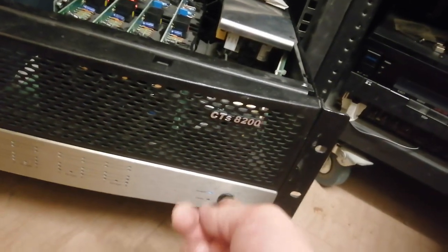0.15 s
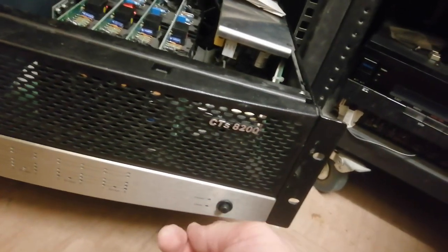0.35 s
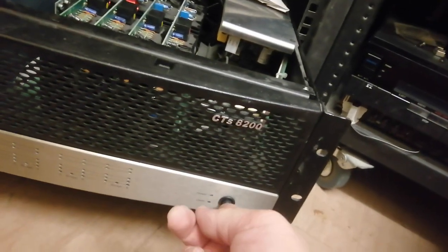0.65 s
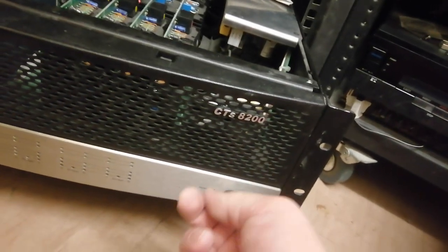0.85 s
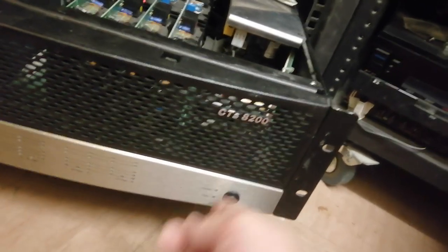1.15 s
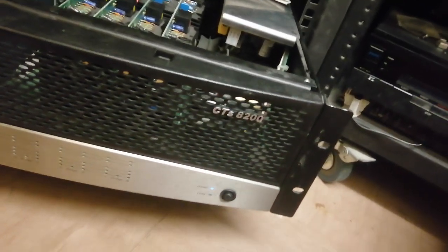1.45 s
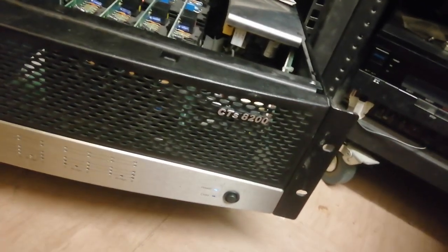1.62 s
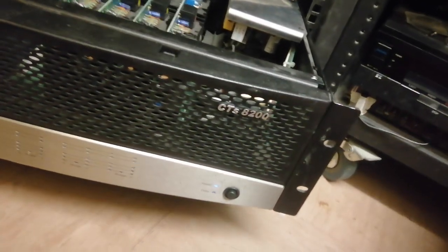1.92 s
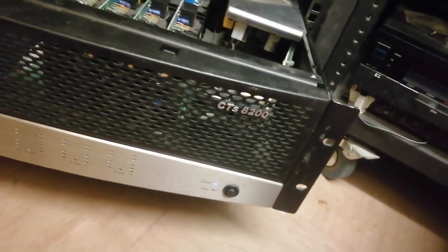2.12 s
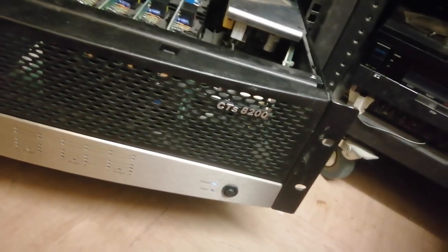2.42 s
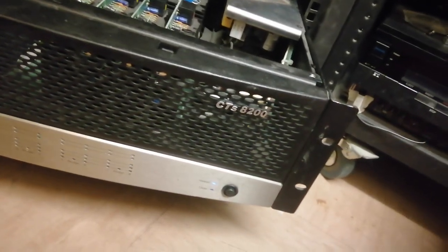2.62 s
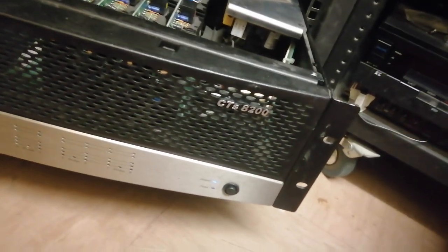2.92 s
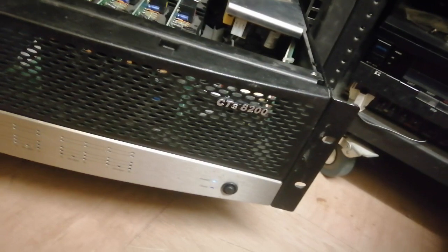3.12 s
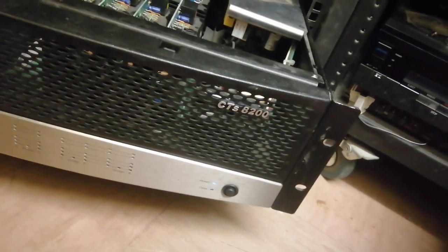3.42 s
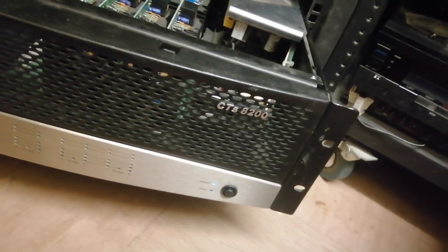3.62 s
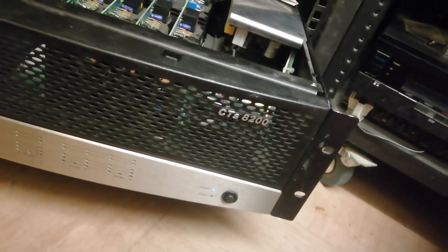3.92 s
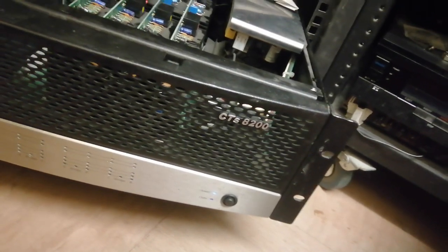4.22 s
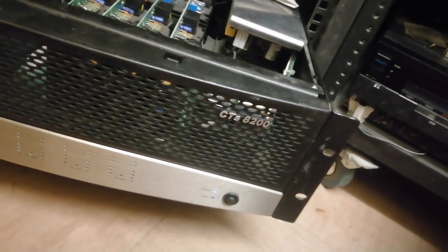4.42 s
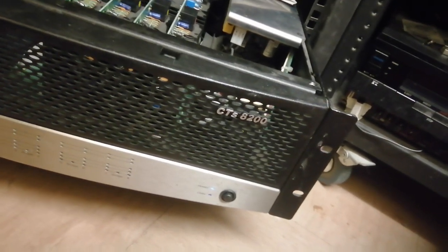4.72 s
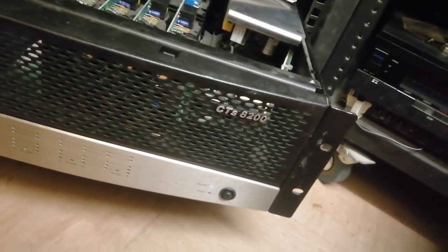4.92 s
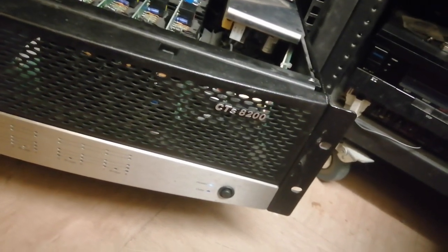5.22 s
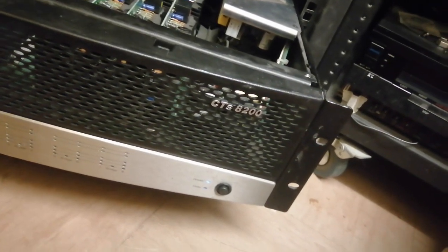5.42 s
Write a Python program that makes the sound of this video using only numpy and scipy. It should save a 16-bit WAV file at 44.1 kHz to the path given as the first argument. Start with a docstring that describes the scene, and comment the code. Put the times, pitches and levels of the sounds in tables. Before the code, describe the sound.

Close stereo microphones in a small workshop catch the crisp clicks of a latching power button, pushed and released twice. The amplifier gives a very faint, short buzz and a thin whistle, ending in a small tick. Only low hum and ventilation remain until one bright, sharp relay click sounds near the end.

```python
"""Rack amplifier powering up

A small workshop, a stereo pair of microphones close to an amplifier with its lid off. A finger works
the latching power button twice; the transformer buzzes, the supply whistles briefly and a relay closes.
Seconds later the output relays snap in. Machines hum steadily in the room, and the recorder's gain
control ducks that hum after each sharp click."""
import sys
import numpy as np
from scipy import signal
from scipy.fft import rfft, irfft
from scipy.io import wavfile
from scipy.ndimage import uniform_filter1d, minimum_filter1d

SR = 44100
rng = np.random.default_rng(int(sys.argv[2]) if len(sys.argv) > 2 else 0)


def int16_out(signal):
    """Quantize to a 16-bit WAV file."""
    q = np.round(np.clip(np.atleast_2d(signal).T, -1, 1) * 32767)
    wavfile.write(sys.argv[1], SR, q.astype(np.int16))


N = 244887
TIME = np.arange(N) / SR
FREQ = np.arange(N // 2 + 1) * SR / N


def undb(db):
    """Decibels to gain."""
    return 10 ** (np.asarray(db) / 20)


def over_pitch(points, hz):
    """Read (Hz, value) points on a log-frequency axis."""
    at, value = np.transpose(points)
    return np.interp(np.log(hz + 1), np.log(at), value)


def pan(db):
    """Microphone gains for a balance: left minus right, in dB."""
    return undb(np.array([[.5], [-.5]]) * db)


def walk(rate_hz):
    """Random drift with a spread of 1."""
    drift = irfft(rfft(rng.standard_normal(N)) * np.exp(-(FREQ / rate_hz) ** 2), N)
    return drift / drift.std()


def noise_pair(likeness):
    """Noise at two microphones that share a part of it."""
    shared = np.sqrt(likeness) * rng.standard_normal(N)
    return shared + np.sqrt(1 - likeness) * rng.standard_normal((2, N))


def ramp(start_s, length_s):
    """A straight rise from 0 to 1."""
    return np.clip((TIME - start_s) / length_s, 0, 1)


def surge(start_s, attack_s, db, fall_db_per_s):
    """Gain that rises from the start and dies away at a steady rate."""
    return ramp(start_s, attack_s) * undb(db - fall_db_per_s * np.maximum(TIME - start_s, 0))


def swells(rows):
    """Gain of soft, bell-shaped swells."""
    return sum(undb(db) * np.exp(-((TIME - at) / length) ** 2) for at, db, length in rows)


def sine(hz, waver_hz, waver_rate):
    """A gliding, unsteady tone of unit power."""
    return np.sqrt(2) * np.sin(2 * np.pi * np.cumsum(hz + waver_hz * walk(waver_rate)) / SR)


def body(x, colour, modes=()):
    """Causal filter of unit power: a broad colour with resonances standing on it."""
    cepstrum = irfft(np.log(undb(over_pitch(colour, FREQ))), N)
    cepstrum[1:N // 2] *= 2  # fold to minimum phase
    cepstrum[N // 2:] = 0
    rings = sum(undb(db) * 1j * FREQ * width / (hz ** 2 - FREQ ** 2 + 1j * FREQ * width)
                for hz, width, db in modes)
    response = np.exp(rfft(cepstrum)) * (1 + rings)
    return irfft(rfft(x) * response / np.sqrt(np.mean(abs(response) ** 2)), N)


# Workshop air and microphone hiss. Each row: frequency in Hz, relative level in dB.
AIR_COLOUR = [(20, 25.5), (38, 17.5), (50, 25.5), (64, 24.5), (105, 17.5), (135, 13.5), (250, 7.5),
              (350, 7.5), (480, 8), (1000, 2.5), (1500, 1), (3000, -2), (4000, -11.5), (5500, -4.5),
              (7000, -9), (8500, -13.5), (12000, -10.5), (13800, -10.5), (14900, -4.5), (15800, -12.5)]
# The air leans to the right microphone. Each row: frequency in Hz, balance in dB.
AIR_PAN = [(50, -3), (300, -11.5), (1000, -5), (2400, -3.5), (15000, -5)]

def air():
    """Ventilation rumble, alike at both microphones, under a thin hiss."""
    likeness = over_pitch([(100, 0.8), (500, 0.64), (1500, 0.048), (5000, 0.12)], FREQ)
    shared = np.sqrt(likeness) * rfft(rng.standard_normal(N))
    separate = np.sqrt(1 - likeness) * rfft(noise_pair(0))
    noise = irfft((shared + separate) * pan(over_pitch(AIR_PAN, FREQ)), N)
    return body(noise, AIR_COLOUR) * undb(-65.5)


# A rush off to the right. Each row: peak time in seconds, level in dB, half-length in seconds.
RUSH_SWELLS = [(0.01, -69, 0.03), (1.36, -65.5, .14), (3.93, -69.5, 0.21)]
# Its hollow colour. Each row: frequency in Hz, relative level in dB.
RUSH_COLOUR = [(150, -21.5), (270, -9), (330, 11), (420, -11), (600, -17), (1400, -28.5), (8000, -55)]

def rush():
    """Low, hollow noise swells and sinks in the room."""
    return body(noise_pair(.8), RUSH_COLOUR) * swells(RUSH_SWELLS) * pan(-8.5)


# Motors and mains around the workshop. Each row: pitch in Hz, level in dB, waver in dB, balance in dB.
MACHINE_TONES = [(48.7, -63, 2.5, -7.5), (102, -85.5, 3.5, -4), (157.7, -76, 1.5, -11),
                 (300, -71, 1.36, -6.5), (549.8, -78, 0.6, -17.5), (626, -88, 3, -11)]

def machine_hum():
    """Steady tones waver in strength and phase; a late drone creeps up in pitch and fades."""
    drone_start_s, drone_hz, climb_hz_per_s = 3.9, 99.3, 7.7
    drone = sine(drone_hz + climb_hz_per_s * (TIME - drone_start_s), waver_hz=3.1, waver_rate=6.9)
    out = drone * surge(drone_start_s, attack_s=0.56, db=-66.5, fall_db_per_s=9) * pan(-12)
    for hz, db, waver_db, pan_db in MACHINE_TONES:
        phase = 2 * np.pi * hz * TIME + 0.24 * waver_db * walk(4)
        out += np.sqrt(2) * np.sin(phase) * undb(db + waver_db * walk(7.9)) * pan(pan_db)
    return out


# A sleeve, right of centre. Each row: peak time in seconds, level in dB, half-length in seconds.
SLEEVE_MOVES = [(0.01, -72, .08), (1.3, -69, .19), (2.75, -76, .4)]
# The colour of the cloth. Each row: frequency in Hz, relative level in dB.
SLEEVE_COLOUR = [(200, -17.5), (500, -6.5), (900, 3.5), (1350, -1), (1900, -7), (3200, -11), (4200, -25),
                 (12000, -29)]

def sleeve():
    """Cloth rustles softly and unevenly as the arm moves."""
    cloth = body(noise_pair(0.34), SLEEVE_COLOUR)
    return cloth * swells(SLEEVE_MOVES) * undb(1.5 * walk(19.85)) * pan(-5.5)


# The case, at centre. Each row: peak time in seconds, level in dB, pitch in Hz, half-length in seconds.
CASE_CREAKS = [(2.639, -77.5, 7080, 0.02), (3.903, -80.5, 3340, 0.019)]

def creaks():
    """The case gives tiny rubs, each a narrow band of noise."""
    out = 0
    for at, db, hz, length in CASE_CREAKS:
        band = 1 / (1 + ((FREQ - hz) / (0.032 * hz)) ** 2)
        rub = irfft(rfft(noise_pair(0.43)) * band, N)
        out = out + rub / rub.std() * swells([(at, db, length)])
    return out


def coil_whistle():
    """A coil sings an arch of pitch while the capacitors charge, fading once the start relay closes."""
    start_s, crest_s, fade_s = 1.318, 1.360, 0.018
    crest_hz, sag_hz = 5675, 160
    closes_s = START_CLICK[0][0]
    past_crest = (np.clip(TIME, start_s, closes_s) - crest_s) / (closes_s - crest_s)
    charging = ramp(start_s, fade_s) - ramp(closes_s, fade_s)
    whistle = sine(crest_hz - sag_hz * past_crest ** 2, waver_hz=22.5, waver_rate=110)
    return whistle * charging * undb(-71.5) * pan(-13)


# The transformer, heard on the right. Each row: mains harmonic number, relative level in dB.
BUZZ_HARMONICS = [(5, 0), (6, -2), (7, -4)]

def transformer(mains_hz=60):
    """The buzz jumps up at switch-on and dies away with the charging current."""
    buzz = sum(undb(db + 2 * walk(10)) * np.sin(2 * np.pi * harmonic * mains_hz * TIME)
               for harmonic, db in BUZZ_HARMONICS)
    current = surge(start_s=1.11, attack_s=.03, db=-61.5, fall_db_per_s=51)
    return buzz * current * pan(-10)


# The small workshop's short decay. Each row: frequency in Hz, seconds to fall 60 dB.
WORKSHOP_DECAY = [(300, 0.3), (1000, 0.14), (2500, .25), (6000, 0.24), (10000, .21), (15000, 0.29)]

def reflections(x, pan_db, bass_db, build_s):
    """Rack, floor and walls send dense echoes back to the microphones."""
    t = TIME[:SR // 2]
    hz = np.arange(len(t) // 2 + 1) * SR / len(t)
    spectrum = rfft(rng.standard_normal((2, len(t))))
    tail = 0
    for centre, t60 in WORKSHOP_DECAY:
        band = over_pitch([(f, float(f == centre)) for f, _ in WORKSHOP_DECAY], hz)
        tail = tail + irfft(spectrum * band, len(t)) * undb(-60 * t / t60)
    tail *= 1 - np.exp(-t / build_s)
    tail /= np.sqrt(np.sum(tail ** 2, axis=1, keepdims=True))
    # low notes leave the case in all directions and come back stronger
    tilt = undb(over_pitch([(500, bass_db), (2500, 2), (9000, -4.5)], hz))
    tail = irfft(rfft(tail) * tilt, len(t))
    return undb(-5.5) * pan(pan_db) * signal.fftconvolve(x, tail, axes=1)[:, :N]


def clicks(rows, colour, modes=(), likeness=.5, size=4096):
    """Each contact chatters for a few milliseconds, building to the stop and dying away in the part."""
    out, chatter = np.zeros((2, N)), noise_pair(likeness)
    lead = size // 8
    t = (np.arange(size) - lead) / SR
    hz = np.arange(size // 2 + 1) * SR / size
    octaves = np.log2(np.maximum(hz, 300) / 5000)
    for at, db, rise, t60, pan_db, bright_db in rows:
        span = int(at * SR) - lead + np.arange(size)
        burst = chatter[:, span] * np.exp(np.where(t < 0, t / rise, -np.log(1000) * t / t60))
        # a harder contact puts more of its energy into the treble
        out[:, span] += undb(db) * pan(pan_db) * irfft(rfft(burst) * undb(bright_db * octaves), size)
    return body(out, colour, modes)


# Relays under the open top. Each row: peak time in seconds, relative level in dB, rise in seconds,
# seconds to fall 60 dB, balance in dB before the case, brightness in dB per octave.
START_CLICK = [(1.4397, -43, 0.00037, 0.042, -2.5, 5)]
OUTPUT_CLICK = [(4.9352, -14, 0.00082, 0.026, 1, 0)]
# Their colours through the case. Each row: frequency in Hz, relative level in dB.
START_COLOUR = [(300, -18), (3000, -15), (3900, -28), (4700, -2.5), (5500, 1.5), (6800, 4.5), (8000, -15.5),
                (10000, -4), (11800, -8.5), (13800, -22), (15200, -18)]
OUTPUT_COLOUR = [(300, -37.5), (480, -32.5), (620, -9.5), (800, -9.5), (1200, -14), (1800, -5), (2300, -15),
                 (3100, -4), (4400, -3), (6200, 11.5), (7800, 1), (9200, -9), (12500, -8), (15000, -7)]
# The output relays' ring. Each row: pitch in Hz, width in Hz, level in dB relative to the colour.
OUTPUT_RING = [(630, 60, 2), (730, 65, 5.5), (1860, 120, 2.5), (5680, 100, -13), (6330, 130, -8),
               (10060, 460, 13.5)]

def relays():
    """Armatures slap shut inside the steel case: the start relay first, the output relays later."""
    start = clicks(START_CLICK, START_COLOUR, likeness=0.07)
    output = clicks(OUTPUT_CLICK, OUTPUT_COLOUR, OUTPUT_RING, likeness=0.32)
    direct = start + output
    return direct + reflections(direct, pan_db=-5.5, bass_db=17, build_s=0.0045)


# The button on the front panel. Each row: peak time in seconds, relative level in dB, rise in seconds,
# seconds to fall 60 dB, balance in dB before the case, brightness in dB per octave.
PLUNGER_PRESSES = [(0.0350, -62, .001, 0.09, -6.5, -1), (0.0650, -27.5, .0006, 0.035, -1, 2.5),
                   (0.1905, -54.5, .001, 0.076, -2, -3.5), (0.9690, -55, .0005, .05, 0.5, -5),
                   (0.9903, -6, 0.00069, 0.038, -1.5, -0.45)]
SPRING_RETURNS = [(0.2090, -23.5, 0.00071, .03, -0.5, -2.4), (0.2118, -11, .0004, .008, 6, 2.5),
                  (0.2137, -17, 0.00047, 0.05, 1.5, 1.2), (0.2220, -24, 0.0031, .035, -8, 1.5),
                  (1.1096, -14.5, 0.0015, .03, -3.5, -0.2), (1.1170, -29.5, 0.0009, 0.014, 8.5, -1)]
SETTLING_KNOCKS = [(0.3810, -46.5, 0.0028, .07, 0, 2), (1.2320, -44.5, 0.0011, 0.059, 2.5, -0.5),
                   (1.3110, -61, .002, 0.067, 5, 3)]
# Their colours through the case. Each row: frequency in Hz, relative level in dB.
PLUNGER_COLOUR = [(200, -38.5), (700, -22.5), (1050, -18.5), (1350, -9), (1950, -10.5), (2550, 1),
                  (3700, -9), (4600, -7), (5600, 1.5), (7300, 4.5), (9000, 2), (11000, 0.5), (14800, -1)]
SPRING_COLOUR = [(200, -31), (380, -20), (550, -6.5), (800, -5), (1250, -2), (1900, -4), (2500, 4.5),
                 (3800, -3.5), (5600, 4.5), (7200, 6), (8300, 2), (11000, -5.5), (13500, -10), (15000, -6)]
KNOCK_COLOUR = [(300, -14), (1000, -17), (1400, -8), (2400, -5), (3500, -25), (6000, -22), (15000, -45)]
# Button and panel ring. Each row: pitch in Hz, width in Hz, level in dB relative to the colour.
BUTTON_RING = [(1300, 50, -5), (1600, 130, -6), (2460, 170, -6.5), (5667, 120, -1), (6160, 130, -7),
               (6890, 340, -1.5), (7300, 270, -3)]
PANEL_RING = [(1358, 53, 12.5), (1690, 100, -2.5)]

def power_button():
    """The plunger goes in, the spring throws it back rattling, and it settles with dull knocks."""
    presses = clicks(PLUNGER_PRESSES, PLUNGER_COLOUR, BUTTON_RING, likeness=0.2)
    returns = clicks(SPRING_RETURNS, SPRING_COLOUR, BUTTON_RING, likeness=.15)
    knocks = clicks(SETTLING_KNOCKS, KNOCK_COLOUR, PANEL_RING, likeness=0.31)
    direct = presses + returns + knocks
    return direct + reflections(direct, pan_db=-2.5, bass_db=11.5, build_s=.006)


# The open case as the pair hears it. Each row: frequency in Hz, balance in dB.
CASE_PAN = [(400, -5), (1200, 3.5), (2600, 0.5), (5300, -8), (7500, 0.5), (9000, 6), (11500, 2),
            (15000, -5)]

def from_case(x):
    """Sound from the case favours one microphone or the other, depending on pitch."""
    return irfft(rfft(x) * pan(over_pitch(CASE_PAN, FREQ)), N)


def scene():
    """Button, relays and supply in front, the hum of the workshop behind."""
    amplifier = from_case(power_button() + relays()) + creaks() + coil_whistle() + transformer()
    return amplifier + machine_hum() + air() + rush() + sleeve()


def gain_control(x, threshold_db, slope, release_db_per_s):
    """A loud click pulls the gain down at once; it then creeps back."""
    power = uniform_filter1d(np.mean(x ** 2, axis=0), size=128)
    over_db = np.maximum(10 * np.log10(np.maximum(power, 1e-12)) - threshold_db, 0)
    recovery = release_db_per_s * TIME
    cut_db = np.maximum.accumulate(slope * over_db + recovery) - recovery
    # a short look-ahead lets the gain fall just before the peak
    return x * uniform_filter1d(minimum_filter1d(undb(-cut_db), size=256), size=128)


def record(dry):
    """The recorder's gain control, then its steep treble limit."""
    held = gain_control(dry, threshold_db=-30, slope=0.6, release_db_per_s=35.5)
    lowpass = signal.ellip(10, .2, 70, 15800, fs=SR, output="sos")
    return signal.sosfilt(lowpass, held)


dry = scene()
out = record(dry)
int16_out(out)
```